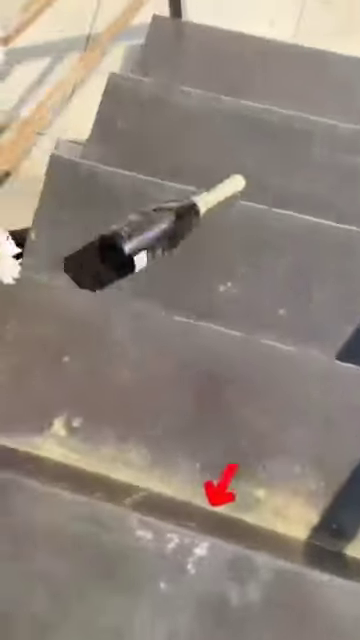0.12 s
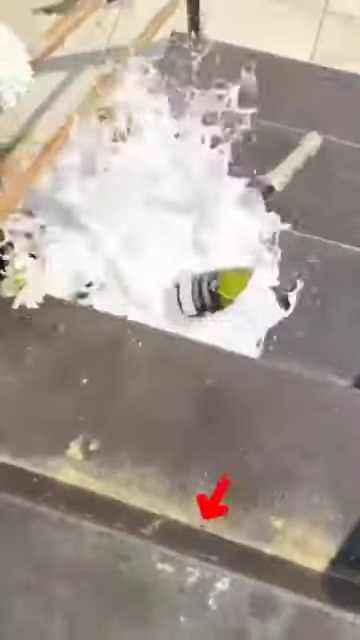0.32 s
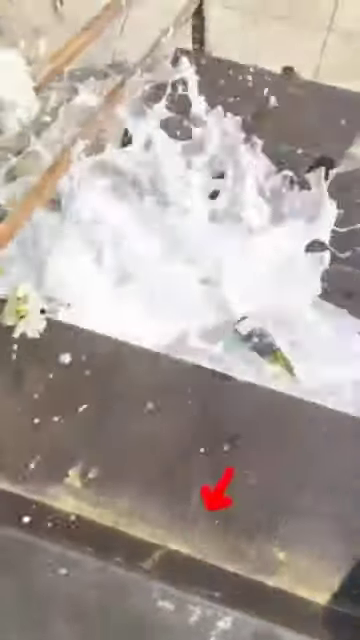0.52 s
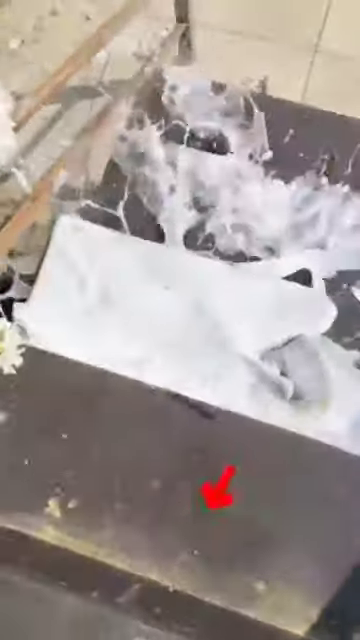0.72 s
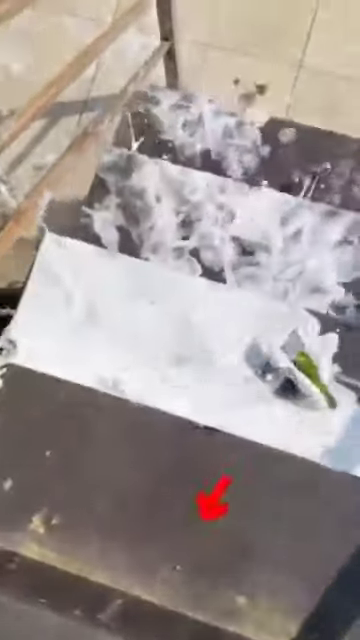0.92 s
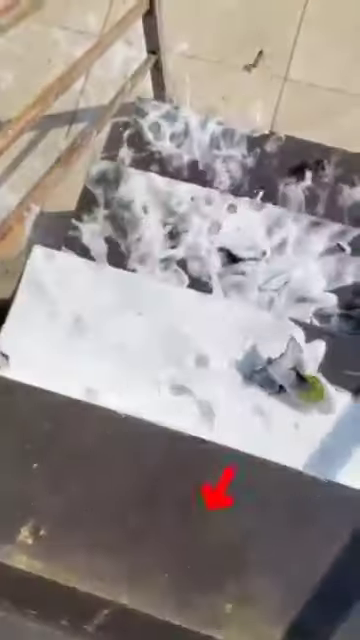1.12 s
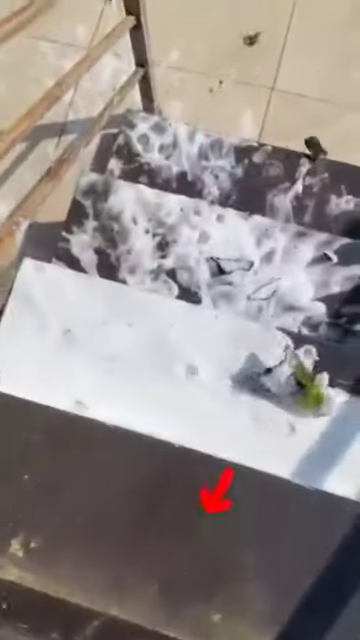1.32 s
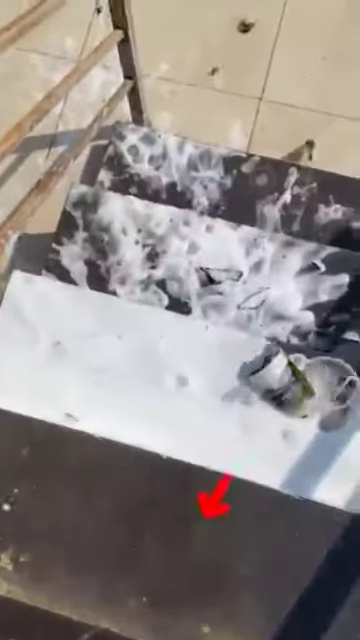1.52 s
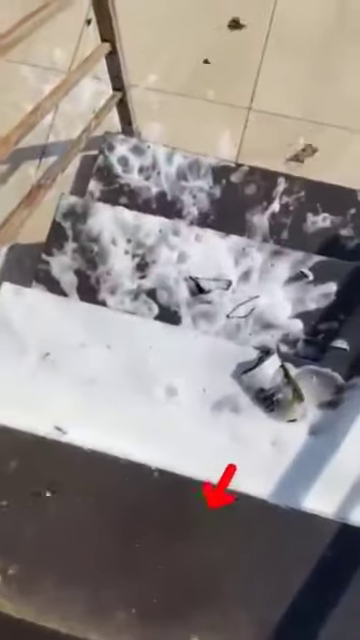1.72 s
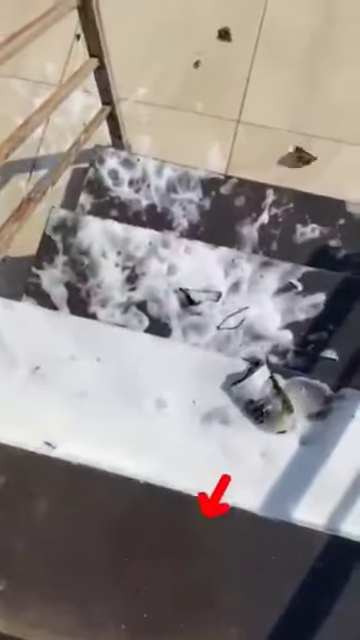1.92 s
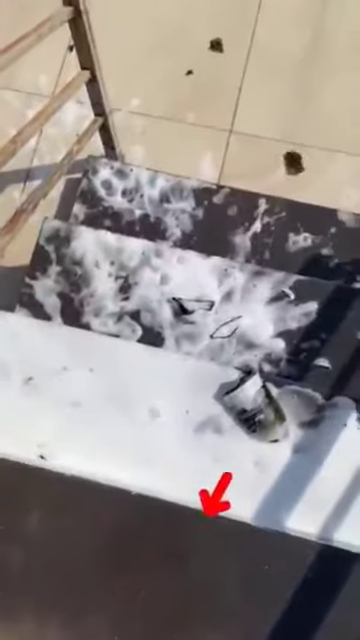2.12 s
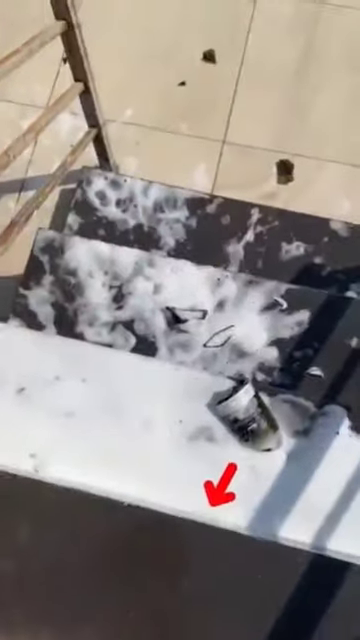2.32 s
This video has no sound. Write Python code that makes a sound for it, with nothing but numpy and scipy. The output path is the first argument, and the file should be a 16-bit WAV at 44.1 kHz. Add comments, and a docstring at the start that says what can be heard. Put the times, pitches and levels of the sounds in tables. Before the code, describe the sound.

Close phone pickup of a bottle bursting on hard steps: small snap, loud popping impact, spray of splintering glass, then dull knocks and bright tinkles from bouncing pieces over foamy hiss, low rumble and brief echo.

```python
"""A full glass bottle bursts on concrete steps near a phone: a crack, a deep pop, then a shatter.
Knocks are sines of falling pitch, sharpened by noise bursts; the shatter is short sines over a crunch.
A rail rings on and four large shards tinkle, all as sums of decaying modes; small ticks are noise.
Foam fizzes as coloured noise with grit in it, over a low rumble of noise, a hum and a short low tone.
Steps and walls return a brief echo, and the two microphone ports of the phone hear it in stereo."""
import sys
import numpy as np
from scipy import signal
from scipy.fft import rfft, irfft, next_fast_len
from scipy.io import wavfile
from scipy.ndimage import uniform_filter1d

SR = 44100
rng = np.random.default_rng(int(sys.argv[2]) if len(sys.argv) > 2 else 0)


def boost(x):
    """Linear amplitude factor 10**(x/20) for a level x in decibels (scalar or array-like)."""
    u = np.asarray(x, float) / 20
    return 10 ** u


def master_out(mix):
    """Clip the mix to full scale and print it as 16-bit PCM to the path in sys.argv[1]."""
    frames = np.transpose(np.atleast_2d(mix))
    ceiling = np.clip(frames, -1, 1)
    pcm = np.round(ceiling * 32767).astype(np.int16)
    wavfile.write(sys.argv[1], SR, pcm)


N = 103635


def colour(x, points):
    """Weight the spectrum by (Hz, dB) points, joined by lines over log frequency."""
    p = np.array(points, float)
    n = next_fast_len(len(x))
    hz = np.arange(n // 2 + 1) * SR / n + 1
    gain_db = np.interp(np.log(hz), np.log(p[:, 0]), p[:, 1])
    return irfft(rfft(x, n) * boost(gain_db), n)[:len(x)]


def band(x, lo_hz, hi_hz, order=2):
    """Band-pass scaled to a standard deviation of 1."""
    edges = [lo_hz, min(hi_hz, .45 * SR)]
    y = signal.sosfilt(signal.butter(order, edges, "band", fs=SR, output="sos"), x)
    return y / np.std(y)


def fade(t, t60):
    """Exponential fall of 60 dB in t60 seconds."""
    return np.exp(-np.log(1000) * t / t60)


def add(out, s, x):
    """Mix x into out from time s."""
    i = max(int(s * SR), 0)
    out[i:i + len(x)] += x[:N - i]


def curve(rows, size=1):
    """Gain over time from column `size` of a dB table."""
    r = np.array(rows, float)
    return boost(np.interp(np.arange(N) / SR, r[:, 0], r[:, size]))


def walk(rate):
    """Slow random wander, spread near 1: random steps at `rate` Hz, smoothed twice."""
    k = int(SR / rate)
    steps = np.repeat(rng.standard_normal(N // k + 1), k)
    return 2.47 * uniform_filter1d(uniform_filter1d(steps, k), k)[:N]


def wavering_tone(hz, depth, rate):
    """A sine whose pitch wanders by about the fraction `depth`."""
    return np.sin(2 * np.pi * np.cumsum(hz * (1 + depth * walk(rate))) / SR)


# The low bed under the steps, before trims and gusts.
# Each row: time in seconds, level of the rumble in dB, level of the low mids in dB.
RUMBLE_LEVELS = [(0.0, -58, -50.5), (0.1, -65.5, -63), (0.18, -46, -86), (0.31, -43.5, -36),
                 (0.37, -34, -35), (0.5, -47, -46), (0.59, -48.5, -40), (0.81, -52.5, -39),
                 (0.94, -64, -47.5), (1.07, -57.5, -46), (1.16, -56.5, -55.5), (1.39, -64, -61.5),
                 (1.6, -69, -49), (1.79, -65, -58.5), (2.06, -64, -55.5), (2.22, -64, -63),
                 (2.35, -65.5, -83.5)]
# A wavering hum. Each row: time in seconds, level in dB.
HUM_LEVELS = [(0.3, -33), (0.346, -62.5), (0.854, -45.5), (1.184, -63.5), (1.492, -56.5), (1.738, -73),
              (2.0, -61.5)]
# A short low tone. Each row: time in seconds, level in dB.
DRONE_LEVELS = [(.42, -79.5), (.47, -42.5), (.64, -51), (.7, -67), (.9, -52), (1.0, -91)]


def rumble():
    """Low noise in two gusting bands, a wavering hum and a short low tone."""
    t = np.arange(N) / SR
    low_gain = curve(RUMBLE_LEVELS) * boost(-2.5 + 2.2 * walk(12))
    low = low_gain * band(rng.standard_normal(N), 15, 120)
    mids_gain = curve(RUMBLE_LEVELS, size=2) * boost(-8.0 + 2.2 * walk(25))
    mids = mids_gain * band(rng.standard_normal(N), 110, 460)
    hum_on = (t > .3) * (t < 2.0)
    hum = curve(HUM_LEVELS) * hum_on * wavering_tone(57, 0.014, 5.0)
    drone = curve(DRONE_LEVELS) * wavering_tone(401, 0.00098, 29)
    return low + mids + hum + drone


def splinters(times, db, t60):
    """Tiny glass bits, each one short mode of random pitch; a few are much louder than the rest."""
    out, t = np.zeros(N), np.arange(SR // 12) / SR
    for s, level_db, (pitch, luck, life) in zip(times, db, rng.random((len(times), 3))):
        hz = 900 * 11.0 ** pitch  # 900 to 9900 Hz
        gain = boost(level_db - 2.0 * np.log(luck + 0.00064))
        add(out, s, gain * fade(t, t60 * (0.28 + life)) * np.sin(2 * np.pi * hz * t))
    return out


# Foam and grit on the steps, before trims and flicker. Each row: time in seconds, level in dB.
FIZZ_LEVELS = [(0.0, -62.5), (0.05, -62.5), (0.22, -93), (0.33, -30.5), (0.37, -51), (0.47, -37.5),
               (0.76, -61.5), (0.93, -41.5), (0.99, -39), (1.11, -51.5), (1.16, -56), (1.39, -50.5),
               (1.54, -48.5), (1.64, -45), (1.75, -50), (1.87, -50.5), (2.06, -54), (2.21, -59),
               (2.35, -58.5)]
# Spectrum of the foam hiss. Each row: frequency in Hz, weight in dB.
FOAM_SPECTRUM = [(200, -3), (500, -6.5), (1200, -1.5), (3000, 4.5), (5000, 8.5), (8000, -5.5),
                 (10000, -7.5)]


def fizz():
    """Foam hiss that flickers, with grit ticking in it at 220 grains a second."""
    hiss = colour(rng.standard_normal(N), FOAM_SPECTRUM)
    times = rng.random(int(220 * N / SR)) * N / SR
    grit = splinters(times, np.zeros(len(times)), .035)
    flickering_hiss = boost(-4.0 + 1.5 * walk(40)) * hiss / np.std(hiss)
    steady_grit = boost(-4) * grit / np.std(grit)
    return curve(FIZZ_LEVELS) * (flickering_hiss + steady_grit)


def burst(s, db, hz, t60, noise):
    """A short burst of noise around hz, taken from the shared noise at time s."""
    t = np.arange(SR // 8) / SR
    i = int(s * SR)
    return boost(db) / 2 * fade(t, t60) * band(noise[i:i + len(t)], hz / 1.61, hz * 1.19, order=1)


# Short noise bursts: a faint creak, the snap of the crack and pop, knock attacks, low rattles, small ticks.
# Each row: start in seconds, level in dB before halving, nominal pitch in Hz, t60 in seconds.
NOISE_BURSTS = [(0.158, -8, 3600, 0.016), (.192, -38, 2850, .1), (0.2049, -3.5, 3500, 0.022),
                (0.205, -17, 18800, 0.009), (0.683, -21, 2410, 0.034), (0.249, -28, 2470, 0.027),
                (0.256, -29.5, 2420, 0.097), (0.57, -21.5, 4000, 0.045), (0.942, -24, 6040, 0.25),
                (0.952, -18.5, 4080, 0.027), (1.417, -26, 2600, 0.019), (.828, -20.5, 3570, 0.034),
                (1.569, -29.5, 581, 0.05), (1.604, -40, 610, 0.11), (1.658, -38, 582, 0.27),
                (0.714, -25.5, 3500, 0.03), (0.732, -21, 2520, 0.099), (1.296, -40.5, 3140, 0.0192),
                (1.37, -28.5, 4530, 0.028), (1.536, -9.5, 3500, 0.0093), (2.184, -45, 4600, 0.035),
                (2.243, -25, 5020, 0.01)]


def noise_bursts(noise):
    """Creak, snaps, knock attacks, rattles and ticks: each one a decaying burst of band noise."""
    out = np.zeros(N)
    for s, db, hz, t60 in NOISE_BURSTS:
        add(out, s, burst(s, db, hz, t60, noise))
    return out


def ring(modes, blows, noise, lands):
    """Every blow cracks and starts the modes with its own balance; a piece that lands is then damped."""
    free_s, land_db, rise_s, rough_db = .013, -7, .0008, 2.2
    out, t = np.zeros(N), np.arange(int(.7 * SR))[:, None] / SR
    hz, mode_db, t60 = np.array(modes, float).T
    # higher modes flutter faster and deeper
    flutter_db = [rough_db * walk(f / 30) * f / 4800 for f in np.maximum(hz, 2500)]
    flutter = boost(np.array(flutter_db).T)
    landing = boost(lands * land_db * np.clip((t - free_s) / 0.0012, 0, 1))
    shape = (1 - np.exp(-t / rise_s)) * landing
    partials = shape * fade(t, t60) * np.sin(2 * np.pi * hz * t)
    # the balance is given at evenly picked modes and joined over log frequency
    picked = np.linspace(0, len(hz) - 1, len(blows[0][2:])).astype(int)
    for s, *balance_db, crack_db in blows:
        gain = boost(mode_db + np.interp(np.log(hz), np.log(hz[picked]), balance_db))
        now = np.roll(flutter, -int(s * SR), axis=0)[:len(t)]
        add(out, s, (gain * now * partials).sum(axis=1))
        add(out, s, burst(s, crack_db, 3500, 0.02, noise))
    return out


# Modes of the wall shard. Each row: frequency in Hz, level in dB, t60 in seconds while undamped.
WALL_MODES = [(1189, 0, .27), (2490, 0, .15), (3480, 0, .09), (4721, 0, .07), (7530, 0, .07)]
# Its blows. Each row: start in seconds, level given to each of the five modes in dB,
# level of the contact crack in dB before halving.
WALL_HITS = [(0.9203, -38.5, -45, -17, -33.5, -33, -18.5), (1.834, -49.5, -42.5, -45, -39.5, -57, -25.5),
             (1.897, -43, -54.5, -45, -25, -32.5, -28.5), (1.939, -46.5, -37, -37.5, -47, -47, -19.5),
             (2.018, -53, -41, -42.5, -59.5, -72, -58)]


def wall_shard(noise):
    """A piece of the bottle wall: five modes, each struck with its own level."""
    return ring(WALL_MODES, WALL_HITS, noise, lands=True)


# Modes of the sliver. Each row: frequency in Hz, level in dB, t60 in seconds while undamped.
SLIVER_MODES = [(4235, 0, .2), (5151, -8, .15), (7988, 0, .14), (9146, -8, .06)]
# Its blows. Each row: start in seconds, levels given to the lowest, middle and highest modes in dB,
# level of the contact crack in dB before halving.
SLIVER_HITS = [(0.962, -17, -34, -33, -17), (.979, -42, -25, -41.5, -26), (1.302, -45.5, -36, -42, -31.5)]


def sliver_shard(noise):
    """A sliver of glass: four high modes that tinkle."""
    return ring(SLIVER_MODES, SLIVER_HITS, noise, lands=True)


# Modes of the bottle neck. Each row: frequency in Hz, level in dB, t60 in seconds while undamped.
NECK_MODES = [(2180, 0, .25), (3590, 6, .14), (4400, -10, .08), (4958, -17, .2), (6700, -4, .08),
              (8690, 0, .07)]
# Its blows. Each row: start in seconds, levels given to the lowest, middle and highest modes in dB,
# level of the contact crack in dB before halving.
NECK_HITS = [(.665, -40.5, -53, -63, -36), (1.016, -41, -59, -47, -49), (1.096, -42, -43, -59.5, -33),
             (1.558, -28, -53, -45, -27.5), (1.644, -25.5, -24, -43, -17.5),
             (1.713, -55, -35, -46.5, -26.5), (2.128, -44.5, -45.5, -54, -41)]


def neck_shard(noise):
    """The bottle neck bouncing on the steps: six modes damped at each landing."""
    return ring(NECK_MODES, NECK_HITS, noise, lands=True)


# Modes of the bottle base. Each row: frequency in Hz, level in dB, t60 in seconds while undamped.
BASE_MODES = [(3196, 0, .3), (3236, -4, .2), (4092, 0, .19), (4125, -8, .2), (7680, -6, .12),
              (7951, 0, .12), (9640, -4, .09)]
# Its blows. Each row: start in seconds, levels given to the lowest, middle and highest modes in dB,
# level of the contact crack in dB before halving.
BASE_HITS = [(.325, -22.5, -27, -22.5, -46), (0.8101, -29, -21, -23, -16), (0.826, -22, -52, -51, -17.5),
             (1.0526, -22, -11.5, -27.5, -19), (1.06, -17.5, -22, -46, -17.5),
             (1.066, -44, -10, -47.5, -13.5), (1.5804, -16.5, -38, -25.5, -21),
             (1.593, -32.5, -20.5, -65, -25.5), (2.0667, -15, -24, -41, -20),
             (2.084, -51, -30.5, -37.5, -23)]


def base_shard(noise):
    """The bottle base bouncing on the steps: seven modes, the lower four in close pairs that beat."""
    return ring(BASE_MODES, BASE_HITS, noise, lands=True)


# The base rolling. Each row: start in seconds, length in seconds, peak level in dB.
BASE_ROLLS = [(.852, 0.047, -31), (1.645, 0.083, -37), (2.15, 0.073, -39)]


def rolling_base():
    """The rolling base keeps its lowest mode going in short swells."""
    out = np.zeros(N)
    for s, length, db in BASE_ROLLS:
        t = np.arange(int(length * SR)) / SR
        swell = np.sqrt(np.sin(np.pi * t / length))
        add(out, s, boost(db) * swell * np.sin(2 * np.pi * BASE_MODES[0][0] * t))
    return out


# Modes of the rail. Each row: frequency in Hz, level in dB, t60 in seconds.
RAIL_MODES = [(690, -7, 1), (845, -6, .9), (1039, -2, .8), (1448, 0, .45), (1667, 0, .6), (1922, -10, .4),
              (2143, 2, .46), (2385, -8, .45), (2625, -3, .2), (2997, -5, 1.1), (3138, -8, .3),
              (3311, -9, .5), (3386, -6, .4), (3478, -4, .42), (3683, -2, .5), (4253, 0, .2),
              (4451, -6, .6), (4610, -8, .4), (4774, -4, .35)]
# Its blows. Each row: start in seconds, levels given to the lowest, middle and highest modes in dB,
# level of the contact crack in dB before halving.
RAIL_HITS = [(.313, -35.5, -38, -50.5, -21), (.3241, -32.5, -28.5, -21.5, -21.5),
             (.730, -47.5, -55, -39, -34)]


def rail(noise):
    """The struck rail rings freely in many long modes; no landing damps it."""
    return ring(RAIL_MODES, RAIL_HITS, noise, lands=False)


# Spectrum of the shatter's crunch. Each row: frequency in Hz, weight in dB.
CRUNCH_SPECTRUM = [(300, -25), (700, -17), (1500, 1), (3000, 1), (4500, 10), (6300, -29.5), (8500, -6.5),
                   (10000, -15.5)]


def shatter():
    """A swarm of splinters, crowded at the start, and a rough crunch of noise, both dying away."""
    start_s, crunch_db, crunch_t60_s = .3240, -18.5, 0.27
    age = 0.46 * rng.random(600) ** 1.9
    swarm = splinters(start_s + age, -31 - 120 * age, 0.013)
    t = np.maximum(np.arange(N) / SR - start_s, 0)
    crunch = colour(rng.standard_normal(N), CRUNCH_SPECTRUM)
    crunch_gain = boost(crunch_db) * (t > 0) * fade(t, crunch_t60_s) * boost(0.9 * walk(180))
    return swarm + crunch_gain * crunch / np.std(crunch)


# Knocks on the concrete, the crack and the deep pop among them; pitch falls as low + turns / (age + lead).
# Each row: start in seconds, level in dB, turns in cycles, low pitch in Hz, length in seconds.
STEP_KNOCKS = [(.022, -49, 0.88, 337, 0.0087), (0.054, -36.5, 0.35, 324, 0.0036),
               (0.1574, -14, 0.67, 780, 0.0031), (0.2049, -2.5, 0.72, 82.5, 0.016),
               (0.570, -20.5, 0.53, 512, 0.0017), (.571, -31, 0.16, 2684, 0.0091),
               (0.729, -31, 0.45, 416, 0.0095), (1.54, -28.5, 0.4, 473, 0.0018),
               (2.236, -53, 0.26, 1200, 0.0044), (2.293, -53.5, 0.36, 1220, 0.0056),
               (0.614, -25.5, 0.84, 800, 0.0027), (.682, -13, 0.79, 151, 0.0031),
               (.690, -27, 0.23, 191, 0.015), (.222, -19, 0.46, 34.7, 0.033),
               (0.746, -18.5, 0.31, 1120, 0.0027), (0.769, -35, 0.29, 444, 0.0069),
               (1.041, -24.5, 0.37, 890, 0.0014), (1.095, -20.5, 0.23, 1093, 0.0016),
               (1.418, -37, 0.68, 1220, 0.0047), (1.505, -28.5, 0.65, 440, 0.0077),
               (1.506, -37.5, 0.22, 194.5, 0.0091), (1.557, -25, 0.53, 886, 0.002),
               (1.643, -26.5, 0.58, 970, 0.0015), (1.674, -38.5, 0.45, 1090, 0.0038),
               (1.833, -42.5, 0.28, 844, 0.0091), (2.127, -36.5, 0.21, 1174, 0.0025)]


def knocks():
    """Bending waves in the step: highs arrive first, lows late, then a weak tail."""
    rise_s, lead_s, tail_db = 0.00042, 0.00044, -16
    out, t = np.zeros(N), np.arange(SR // 4) / SR
    for s, db, turns, low_hz, length in STEP_KNOCKS:
        body = np.exp(-(t / length) ** 3)
        tail = boost(tail_db) * np.exp(-t / (2 * length))
        shape = (1 - np.exp(-t / rise_s)) * (body + tail)
        cycles = low_hz * t + turns * np.log(1 + t / lead_s)
        add(out, s, boost(db) * shape * np.sin(2 * np.pi * cycles))
    return out


def echoes(hits):
    """Brief echo off steps and walls: three unlike tails of fading noise, each starting after 3 ms."""
    t = np.arange(SR // 2) / SR
    out = []
    for _ in range(3):
        tail = band(rng.standard_normal(len(t)), 570, 7600, order=1) * fade(t, 0.2) * (t > .003)
        tail = tail / np.sqrt(np.sum(tail ** 2))
        out.append(signal.fftconvolve(hits, tail)[:N] * boost(-17.5))
    return out


# Colour of the left microphone port. Each row: frequency in Hz, weight in dB.
LEFT_COLOUR = [(100, .5), (300, -4.5), (700, -2.5), (1500, 0), (3000, .3)]
# Phase of the left microphone port. Each row: frequency in Hz, phase shift in radians.
LEFT_PORT_PHASE = [(0, 0), (400, -.65), (1550, -1.3), (2150, .2), (3200, -.7), (4100, -1.7), (6100, -3.15),
                   (7950, -4.35), (9640, -6.1), (16000, -12)]


def left_port(near):
    """The left microphone port adds its own colour and phase."""
    n = next_fast_len(N + 256)
    hz, phase = np.array(LEFT_PORT_PHASE).T
    turn = np.exp(1j * np.interp(np.arange(n // 2 + 1) * SR / n, hz, phase))
    return irfft(rfft(colour(near, LEFT_COLOUR), n) * turn, n)[:N]


# Shards scatter sideways. Each row: time in seconds, left over right in dB.
SIDEWAYS = [(0, -.5), (1.4, 0), (1.55, 3.5), (1.75, 3.5), (1.9, .5)]


def scene():
    """All hits and their echo join the fizz and rumble, then spread over the two ports."""
    noise = rng.standard_normal(N + SR)
    hits = knocks() + shatter() + rolling_base() + noise_bursts(noise)
    hits = hits + rail(noise)
    hits = hits + base_shard(noise) + neck_shard(noise) + sliver_shard(noise) + wall_shard(noise)
    shared_echo, left_echo, right_echo = echoes(hits)
    near = hits + shared_echo + fizz() + rumble()
    pan = np.sqrt(curve(SIDEWAYS))
    return np.array([left_port(near) * pan + left_echo, near / pan + right_echo])


def roll_off(x):
    """The treble ends steeply here."""
    return signal.sosfilt(signal.butter(12, 16460, fs=SR, output="sos"), x)


def record(dry):
    """The phone drops the top steeply, by 26 dB above 9425 Hz, and clips at full scale."""
    low = signal.sosfiltfilt(signal.ellip(5, .2, 30, 9425, fs=SR, output="sos"), dry)
    mix = np.clip(low + boost(-26) * (dry - low), -1, 1)
    return roll_off(mix)


dry = scene()
out = record(dry)
master_out(out)
```